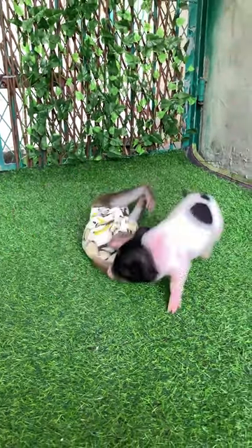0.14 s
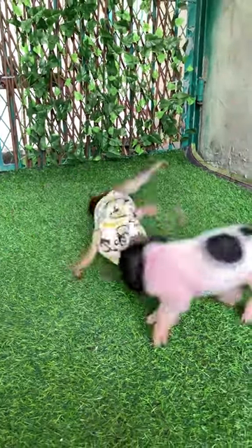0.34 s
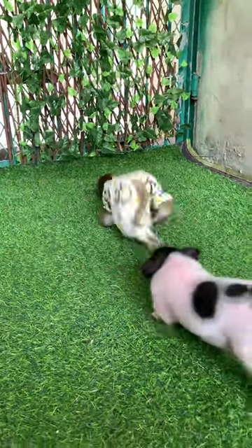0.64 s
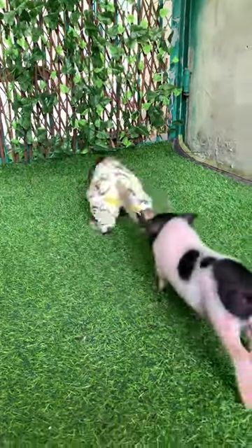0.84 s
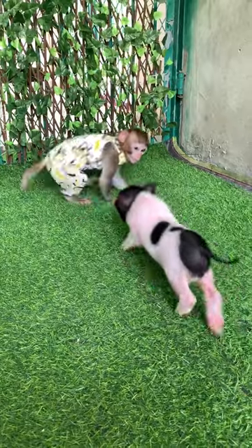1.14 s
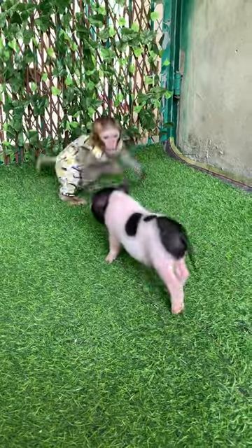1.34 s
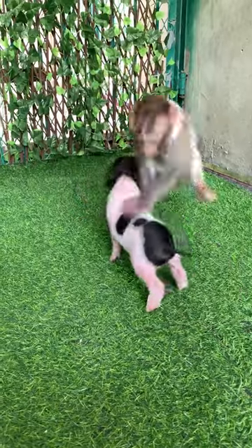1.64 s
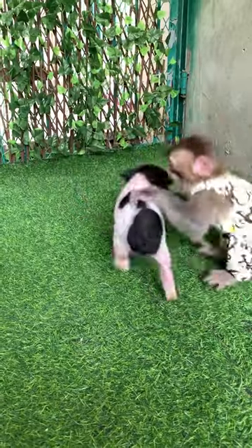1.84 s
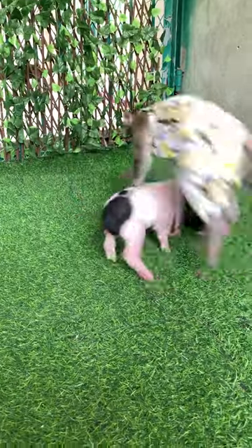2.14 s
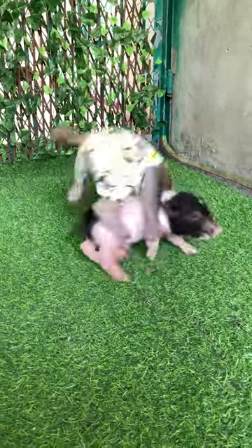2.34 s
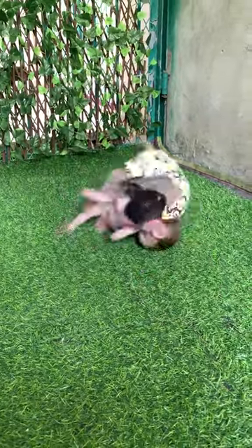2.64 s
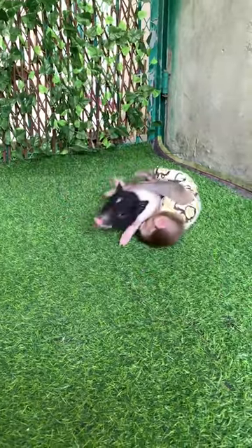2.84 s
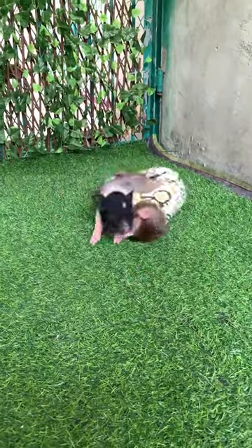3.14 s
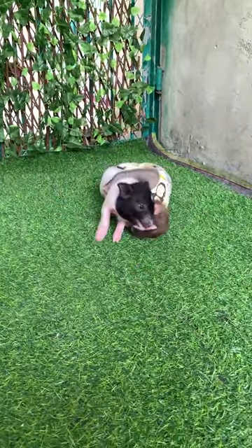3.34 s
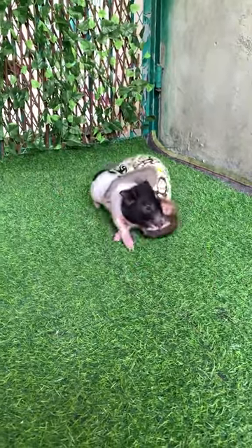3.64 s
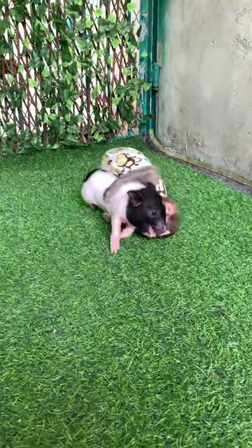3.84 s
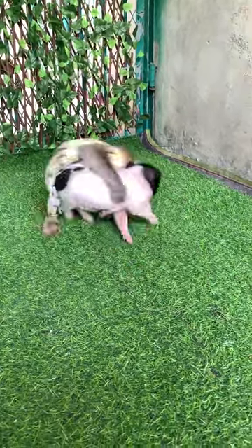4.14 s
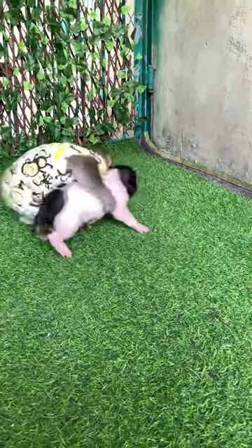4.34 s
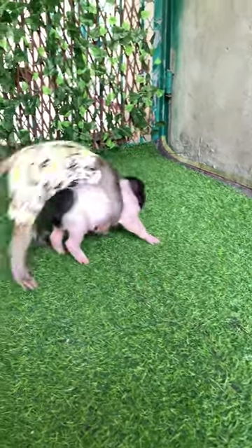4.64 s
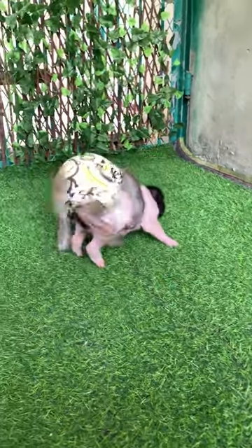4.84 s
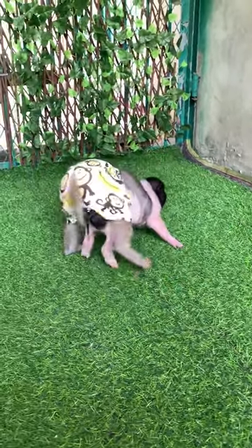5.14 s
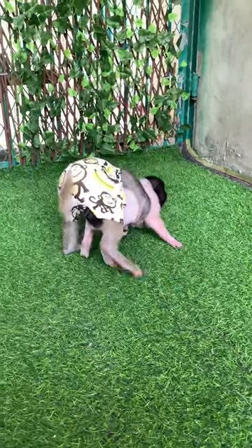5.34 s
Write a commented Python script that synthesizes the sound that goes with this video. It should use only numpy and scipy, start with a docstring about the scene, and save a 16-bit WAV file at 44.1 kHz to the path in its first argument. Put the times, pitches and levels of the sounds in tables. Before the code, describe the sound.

A piglet and a small monkey tussle on artificial turf, with crackly scuffs, dull body thumps and brief rough squeaks over a low rumble.

```python
"""A piglet and a baby monkey wrestle on artificial turf in a small walled yard, close to a stereo microphone.
It opens with a faint squeak, thin chirps and a flurry of scuffs: plastic blades crackle as filtered snaps and
hiss. After a lull bodies thump down as sagging low cycles over a ringing floor; from 2.8 s come short rough
squeaks, harmonic bursts through snout resonances. More scuffs and thumps follow, and a wavering hum swells near
the end. The walls answer with short tails of noise, and a low rumble of coloured noise goes on behind."""
import sys
import numpy as np
from scipy import signal
from scipy.fft import rfft, irfft
from scipy.io import wavfile

SR = 44100
rng = np.random.default_rng(int(sys.argv[2]) if len(sys.argv) > 2 else 0)


def int16_out(signal):
    """Quantize to a 16-bit WAV file."""
    q = np.round(np.clip(np.atleast_2d(signal).T, -1, 1) * 32767)
    wavfile.write(sys.argv[1], SR, q.astype(np.int16))


N = 241294
TIME = np.arange(N) / SR
BINS_HZ = np.arange(N // 2 + 1) * SR / N

# phase by which the left channel leads the right: frequency_hz, lead_radians
CHANNEL_LEAD = [(0, 0), (800, -1), (1750, 0), (2400, 1), (3800, 1.6), (4400, 2.1), (5100, 3.14), (6000, 4.7),
                (7100, 6), (9000, 6.5), (11300, 9.42), (12500, 11.6), (14300, 12.57), (16500, 13)]


def undb(db):
    """Decibels to gain."""
    return 10 ** (np.asarray(db) / 20)


def unit(x):
    """Scale to an rms of one."""
    return x / np.sqrt(np.mean(x ** 2) + 1e-18)


def add(track, start_s, sound):
    """Mix a sound into a track at a time."""
    i = max(int(start_s * SR), 0)
    track[i:i + len(sound)] += sound[:max(N - i, 0)]


def colour(x, points):
    """Shape a sound by a smooth (Hz, dB) spectrum."""
    hz, db = np.transpose(points)
    gain_db = np.interp(np.log(BINS_HZ + 1), np.log(hz), db)
    return irfft(rfft(x) * undb(gain_db), N)


def resonate_twice(x, hz, width_hz):
    """Two passes through one resonance, gain one at its centre; the width is that of a single pass."""
    b, a = signal.iirpeak(hz, hz / width_hz, fs=SR)
    return signal.lfilter(b, a, signal.lfilter(b, a, x))


def lowpass(x, order, hz):
    """Keep what lies below a corner frequency."""
    return signal.sosfilt(signal.butter(order, hz, fs=SR, output="sos"), x)


def tilt(x, db, split_hz=2800):
    """Lean a sound towards its lows (positive dB) or its highs."""
    low = signal.sosfiltfilt(signal.butter(1, split_hz, fs=SR, output="sos"), x)
    return low * undb(db / 2) + (x - low) * undb(-db / 2)


def walk(n, rate):
    """Smooth random wander with a spread near one, through rate points a second."""
    count = int(n * rate / SR) + 2
    points = rng.standard_normal(count)
    return 1.3065 * np.interp(np.arange(n) * rate / SR, np.arange(count), points)


def blades(n, rate, spread_db):
    """Tiny snaps of plastic blades, rate a second and uneven in level, over a fine hiss."""
    struck = rng.random(n) < rate / SR
    sizes = undb(spread_db * np.minimum(rng.exponential(size=n), 5))
    snaps = struck * rng.choice([-1, 1], n) * sizes
    return 1.2 * unit(snaps) + .3 * rng.standard_normal(n)


def patchy(x, patchy_db=3.0):
    """Tufts differ in stiffness, so each half octave of the rustle wavers on its own."""
    octaves = np.clip(np.log2(np.arange(1, N // 2 + 2) * SR / N / 500), 0, 5)
    spectrum, out = rfft(x), np.zeros(N)
    for k in range(11):
        band = np.maximum(1 - abs(2 * octaves - k), 0)  # overlapping triangles
        out += irfft(spectrum * band, N) * undb(patchy_db * walk(N, rate=22))
    return out


def turf(flicker_db=0.43, clump_db=4):
    """Restless shifting, longer slides and single scuffs all flick the same plastic blades."""
    # restless shifting under all the moves: time_s, relative_level_db, low_over_high_tilt_db
    stir = [(0.0, -46, 5), (0.29, -43.5, 18.5), (0.48, -33.5, 13.5), (.56, -32.5, 13), (.62, -35, 14),
            (.68, -36, 17), (.82, -41, 12), (1.14, -45.5, 7), (1.44, -41, 10), (1.54, -43.5, 5),
            (1.72, -45.5, 11), (2.25, -38.5, 14), (2.42, -41, 11.5), (2.51, -35, 8), (2.57, -32, 0),
            (2.7, -29.5, 7), (2.83, -35, 5), (2.98, -38, 9.5), (3.309, -47, 9.5), (3.88, -44, 19.5),
            (4.1, -41.5, 4), (4.24, -39, 7), (4.33, -39, 2.5), (5.0, -41.5, 12.5), (5.12, -42.5, 6),
            (5.27, -53, 19), (5.47, -67.5, -6)]
    # a flank or leg drags, swelling and fading: middle_s, length_s, relative_level_db, low_over_high_tilt_db
    slides = [(0.349, 0.19, -33.5, 15), (0.706, 0.18, -34, 13.5), (0.895, 0.13, -37.5, 16),
              (1.008, 0.19, -40, 11), (1.343, 0.18, -38.5, 12), (1.81, 0.062, -47, 2),
              (1.928, 0.11, -36, 14), (2.06, 0.26, -43.5, 24), (2.242, 0.12, -35.5, 11),
              (2.339, 0.12, -41, 0), (2.573, 0.11, -27, 12), (2.643, 0.16, -24, 9.5),
              (2.744, 0.16, -30, 15), (2.966, 0.16, -36, 11.5), (3.394, 0.092, -45.5, 17),
              (3.497, 0.5, -55.5, 23), (3.625, 0.17, -41.5, 7), (3.807, 0.097, -43.5, 4.5),
              (4.8, 0.14, -53, -17), (4.888, 0.12, -39.5, 15), (5.134, 0.21, -40.5, 4)]
    # a foot or claw rakes the turf: start_s, relative_level_db, decay_s, low_over_high_tilt_db
    scuffs = [(.149, -36.5, 0.015, 14), (0.248, -31, 0.022, 15), (0.29, -26.5, 0.011, 5),
              (0.445, -30, 0.0063, 12), (.510, -24.5, 0.0057, 5.5), (0.586, -31, 0.0091, 22),
              (0.629, -24.5, 0.0058, 14), (.654, -23, 0.0042, 10), (1.294, -33, 0.005, 3),
              (1.312, -35, .009, 8), (1.667, -32, 0.0089, 6), (1.937, -14.5, 0.0063, 21.5),
              (1.948, -25.5, 0.035, 17.5), (2.938, -36.5, 0.013, 26), (3.197, -34.5, 0.034, 6),
              (3.908, -28, 0.018, 14.5), (3.934, -32.5, 0.017, 15), (3.996, -37, 0.0058, 31),
              (4.33, -36.5, 0.0242, 4.5), (4.474, -35.5, 0.0049, 20), (4.527, -34.5, 0.011, 5),
              (4.716, -29.5, 0.01, 17), (4.982, -35.5, 0.015, 7), (5.362, -55.5, 0.0096, -23)]
    # colour of the brushed blades: frequency_hz, gain_db
    turf_colour = [(150, -3.5), (300, -7), (550, -8.5), (1000, -6.5), (1500, -4), (2400, -1.5), (3100, -2),
                   (4200, -1), (6500, 0.5), (9000, 1), (10500, -3), (13000, -1), (16000, -4)]

    times_s, levels_db, tilts_db = np.transpose(stir)
    lean_db = np.interp(TIME, times_s, tilts_db) + clump_db * walk(N, rate=45)  # colour wanders
    snaps = tilt(unit(blades(N, rate=2200, spread_db=-1.2)), lean_db)
    snaps *= undb(np.interp(TIME, times_s, levels_db))

    for middle_s, length_s, level_db, tilt_db in slides:
        n = int(length_s * SR)
        lean_db = tilt_db + clump_db * walk(n, rate=62.2)
        drag = tilt(unit(blades(n, rate=1500, spread_db=-2.0)), lean_db) * np.hanning(n)
        add(snaps, middle_s - length_s / 2, drag * undb(level_db + 0.46))
    snaps = patchy(snaps) * undb(flicker_db * walk(N, rate=90))  # blades catch and let go

    for start_s, level_db, decay_s, tilt_db in scuffs:
        rise_s = 0.54 * decay_s  # a longer stroke also starts more softly
        t = TIME[:int(7 * decay_s * SR)]
        stroke = np.minimum(t / rise_s, 1) * np.exp(-np.maximum(t - rise_s, 0) / decay_s)
        rake = tilt(unit(blades(len(t), rate=9000, spread_db=-4.0)), tilt_db)
        add(snaps, start_s, rake * stroke * undb(level_db))
    return colour(snaps, turf_colour) * undb(4.0)


def crunches(peak_s=0.001, width_hz=910):
    """Stiff tufts buckle under a foot, each cracking as a noise burst in its own band."""
    # start_s, level_db, centre_hz
    tufts = [(0.1508, -39, 890), (.294, -30, 1096), (0.339, -30, 1490), (0.447, -27, 2790),
             (0.514, -23.5, 2320), (.542, -26, 2310), (.576, -37, 1000), (.594, -29, 1180),
             (0.601, -23, 895), (.631, -33, 2400), (0.6534, -20, 1700), (.657, -18, 900),
             (0.667, -35, 1000), (.687, -36, 1500), (.709, -26, 1560), (.914, -44, 2020),
             (1.317, -36, 2000), (1.940, -11.5, 1630), (2.621, -21, 1090), (2.656, -22, 1680),
             (2.678, -24.5, 2940), (2.712, -25, 1600), (2.741, -24, 1810), (2.942, -27, 1700),
             (4.0, -27, 1530), (4.718, -34, 1500), (4.984, -32, 900)]
    out, t = np.zeros(N), TIME[:SR // 25]
    swell = t / peak_s * np.exp(1 - t / peak_s)
    for start_s, level_db, hz in tufts:
        crack = unit(resonate_twice(rng.standard_normal(len(t)), hz, width_hz))
        add(out, start_s, undb(level_db) * crack * swell)
    return out


def ticks(ring_db=-29, ring_s=.004):
    """A claw or hoof catches and snaps free: an instant crack, and the blades around it shiver on."""
    # start_s, level_db, decay_s, low_over_high_tilt_db
    catches = [(.0462, -32, .002, -7), (.1515, -34, .002, 11), (0.4458, -19, 0.00081, 5),
               (.5122, -18.5, 0.001, 1), (0.5144, -28, 0.00088, 2), (0.5425, -22, .0008, 6),
               (.6303, -26, .002, 10), (0.6572, -22.5, 0.0018, 7), (1.2972, -26, .0008, -8),
               (1.6707, -35, 0.0018, -4), (1.9406, -10, 0.0013, 17), (2.2305, -20, .0015, 6),
               (4.2048, -15.5, 0.00072, -4), (4.7178, -30, 0.0013, 5)]
    out, t = np.zeros(N), TIME[:SR // 40]
    for start_s, level_db, decay_s, tilt_db in catches:
        fade = np.exp(-t / decay_s) + undb(ring_db) * np.exp(-t / ring_s)
        crack = tilt(rng.standard_normal(len(t)), tilt_db) * fade
        add(out, start_s, undb(level_db) * crack)
    return out


def thumps(sag=0.27, sag_s=0.017, rise_s=0.00289, slap_hz=400, slap_width_hz=420, decay_cycles=1.64):
    """A soft body or foot lands: a few low cycles that sag in pitch, a dull slap, then the floor booms."""
    # start_s, level_db, starting_pitch_hz, floor_boom_db and slap_db relative to the level
    landings = [(0.149, -32.5, 568, -30, -6), (.375, -20, 148, -13.5, -11.5), (0.635, -24, 123, -10, -21),
                (1.851, -30, 366, -11, -16), (1.956, -16, 139, -7, -13.5), (2.217, -18.5, 345, -26.5, -16),
                (2.218, -32, 622, -35, -17), (2.221, -11, 189.3, -39, -27),
                (2.258, -22.5, 217.6, -20, -36.5), (2.535, -20, 196, -6.5, -11),
                (2.609, -12.5, 148.5, -7.5, -19), (2.632, -9, 125, -20, -45.5),
                (2.926, -21, 163, -11.5, -13), (2.957, -20, 108.6, -16, -27),
                (3.232, -28, 157.7, -13.5, -2.5), (4.269, -19, 208, -11.5, -28), (4.271, -33, 383, -25, -8),
                (4.339, -20, 132, -16, -12.5), (4.479, -22.5, 161, -16.5, -19), (4.979, -12, 161, -20, -26),
                (4.986, -19, 99, -16, -24), (5.067, -33, 106, -3, -36)]
    # ring of the floor under a blow: frequency_hz (nominal), t60_s, gain_db
    floor_modes = [(62.4, 0.51, 6.5), (79.8, 0.64, -4), (107.4, 0.25, 5.5), (160, 0.4, -2.5),
                   (242.5, 0.29, -6), (313, 0.12, -27), (575, 0.11, -16)]
    out, t = np.zeros(N), TIME[:SR // 2]
    for start_s, level_db, hz, boom_db, slap_db in landings:
        pitch_hz = hz * (1 - sag * (1 - np.exp(-t / sag_s)))
        cycles = np.sin(2 * np.pi * np.cumsum(pitch_hz) / SR)
        push = (1 - np.exp(-t / rise_s)) ** 2 * np.exp(-t * hz / decay_cycles)  # low thumps last longer
        slap = unit(resonate_twice(rng.standard_normal(len(t)), slap_hz, slap_width_hz))
        blow = push / push.max() * (cycles + undb(slap_db) * slap)

        boom = np.zeros(len(t))
        for mode_hz, t60_s, gain_db in floor_modes:
            detuned_hz = mode_hz * (1 + 0.025 * rng.standard_normal())  # varies from blow to blow
            boom += undb(gain_db) * np.sin(2 * np.pi * detuned_hz * t) * undb(-60 * t / t60_s)
        boom *= 1 - np.exp(-t / 0.016)
        add(out, start_s, undb(level_db) * (blow + undb(boom_db) * boom))
    return out


def resonances(x, table):
    """Sum of parallel resonances, each of two passes."""
    return sum(undb(db) * resonate_twice(x, hz, width_hz) for hz, width_hz, db in table)


def squeaks(jitter=0.1, rasp=0.31, fade_db=3, flutter_db=3, edge_s=0.0043,
            throat_hz=500, throat_width_hz=380, mouth_width_hz=480):
    """The piglet's voice: pitch and mouth resonance fall together, a growl adds tones between the
    harmonics, and air hisses in step with each cycle."""
    # start_s, length_s, level_db, starting_pitch_hz, fall (share of pitch), overtones_db (relative to the tone),
    # mouth_resonance_hz, roughness (0-1), growl (0-1), hiss_db (relative to the voice)
    bursts = [(0, 0.22, -45, 805, 0.18, -15.5, 1480, 0.57, 0.16, -26),
              (2.776, 0.016, -20.5, 532, 0.082, 11, 1610, 0.07, 0.2, -17.5),
              (2.781, 0.022, -14, 514.3, 0.15, -3.5, 1500, 0.22, 0.04, -7),
              (2.797, 0.016, -19, 637, 0.069, -8, 1520, 0.38, 0, -11),
              (2.81, 0.04, -26.5, 462, 0.059, -1, 890, 0.1, 0.23, -13),
              (3.0632, 0.017, -19.5, 637, 0.17, -26, 1400, 0.02, 0, -20),
              (3.079, 0.019, -23.5, 623, 0.1, -18, 1330, 0.3, 0.09, -21),
              (3.093, 0.024, -24, 694, 0.17, -17, 1330, 0.38, 0.32, -13),
              (3.216, 0.033, -30, 694, 0.26, -17, 1740, 0.4, 0.42, -18),
              (4.259, 0.01, -24.5, 616, 0.056, -12, 1630, 0.3, 0.2, -23),
              (4.2695, 0.018, -20.5, 740, 0.1, -13.5, 1670, 0.28, 0.25, -20),
              (4.282, 0.015, -17, 688, 0.12, -21, 1610, 0.34, 0.05, -22),
              (4.295, 0.078, -34.5, 468.5, 0.146, -7, 1410, 0.67, 0.15, -26)]
    # fixed resonances of the snout: frequency_hz, width_hz, gain_db
    snout = [(1850, 500, -7), (4250, 750, -4)]
    # resonances of the air forced through the snout: frequency_hz, width_hz, gain_db
    snout_hiss = [(4400, 750, 6), (8000, 4100, 1), (13500, 2200, -9)]
    out = np.zeros(N)
    for start_s, length_s, level_db, hz, fall, overtones_db, mouth_hz, rough, growl, hiss_db in bursts:
        n = int(length_s * SR)
        t = TIME[:n]
        along = t / length_s
        edges = np.clip(np.minimum(t, length_s - t) / edge_s, 0, 1)  # opening and closing
        effort = np.sin(np.pi / 2 * edges) * undb(-fade_db * along)

        pitch_hz = hz * (1 - fall * along) * (1 + jitter * rough * walk(n, rate=485))
        phase = 2 * np.pi * np.cumsum(pitch_hz) / SR
        air = rng.standard_normal((3, n)) * (1 + 2.1 * np.cos(phase))
        harmonics = unit(sum(np.cos(k * phase) / k for k in range(2, 11)))
        folds = harmonics + 3 * rough * air[0]

        # crossfade from the starting mouth resonance to the fallen one
        wide = resonate_twice(folds, mouth_hz, mouth_width_hz)
        closing = resonate_twice(folds, mouth_hz * (1 - fall), mouth_width_hz)
        overtones = unit(wide * (1 - along) + closing * along + resonances(folds, snout))
        throat = unit(resonate_twice(air[1], throat_hz, throat_width_hz))
        growl_tones = np.sin(2 * phase / 3) + .5 * np.sin(4 * phase / 3)
        tone = unit(np.sin(phase) + growl * growl_tones)

        voice = unit(tone + 0.88 * rough * throat + undb(overtones_db) * overtones)
        voice *= 1 + rasp * rough * walk(n, rate=404)
        voice *= undb(flutter_db * rough * walk(n, rate=160))
        hiss = unit(resonances(air[2], snout_hiss))
        add(out, start_s, undb(level_db) * unit(voice + undb(hiss_db) * hiss) * effort)
    return out


def chirps(fall=.12):
    """Thin high squeaks, ticks and faint whines: narrow noise that swells, sinks in pitch and fades."""
    # start_s, length_s, level_db, middle_pitch_hz, blur_hz (three times the corner of the low-pass)
    thin_sounds = [(0.019, 0.01, -26.5, 6590, 1500), (0.045, 0.00563, -25, 5860, 1100),
                   (0.042, 0.0138, -33, 2670, 300), (.05, 0.094, -48, 6900, 1500),
                   (0.794, 0.59, -51, 1030, 170), (1.096, .22, -50, 2560, 800),
                   (1.293, .008, -31, 13800, 3000), (1.447, .009, -35, 13000, 1500),
                   (1.514, 0.16, -43, 3830, 700), (1.591, 0.0083, -33.5, 6970, 2600),
                   (1.78, 0.064, -43.5, 3960, 900), (2.096, 0.056, -40, 8660, 1400),
                   (2.804, 0.0044, -28.5, 8850, 2500), (3.092, 0.00685, -25.5, 8000, 3000),
                   (3.105, 0.0073, -32, 7900, 2500), (3.115, 0.011, -33, 7800, 2500),
                   (3.195, 0.0053, -31.5, 8000, 2600), (3.214, 0.0064, -32.5, 7660, 2200),
                   (3.226, 0.005, -38, 8300, 1800), (4.548, 0.075, -45, 2640, 794)]
    out = np.zeros(N)
    for start_s, length_s, level_db, hz, blur_hz in thin_sounds:
        n = int(length_s * SR)
        blur = lowpass(rng.standard_normal((2, n)), 2, blur_hz / 3)
        pitch_hz = hz * (1 + fall * np.linspace(.5, -.5, n))
        phase = 2 * np.pi * np.cumsum(pitch_hz) / SR
        chirp = unit(blur[0] * np.cos(phase) + blur[1] * np.sin(phase))
        add(out, start_s, undb(level_db) * chirp * np.hanning(n))
    return out


def two_channels(x, right_db):
    """Direct sound comes out in two channels with a phase lead that varies with frequency, right over left in
    dB."""
    hz, radians = np.transpose(CHANNEL_LEAD)
    lead = np.exp(.5j * np.interp(BINS_HZ, hz, radians))
    left = irfft(rfft(x) * lead, N) * undb(-right_db / 2)
    right = irfft(rfft(x) / lead, N) * undb(right_db / 2)
    return np.array([left, right])


def yard(x, wet_db, t60_s, treble_t60_s=0.81, build_s=0.014):
    """Scattered wall reflections, different on each side; lows and treble die at their own rates."""
    t = TIME[:SR * 3 // 4]
    noise = rng.standard_normal((2, len(t)))
    low = lowpass(noise, 2, 2000)
    build = np.minimum(t / build_s, 1)
    low_fade, treble_fade = undb(-60 * t / t60_s), undb(-60 * t / treble_t60_s)
    tail = (low * low_fade + .5 * (noise - low) * treble_fade) * build
    tail *= undb(wet_db) / np.sqrt(np.sum((low_fade * build) ** 2))
    return signal.fftconvolve(x[None], tail, axes=1)[:, :N]


def diffuse(pair, direct):
    """Sound from many directions: alike in the two channels in some bands, opposed in others; a direct share
    keeps the channels' phase lead."""
    # likeness of the two channels: frequency_hz, correlation (-1 to 1)
    likeness = [(0, 1), (70, .997), (180, .9), (350, .55), (800, .35), (1400, .82), (1800, .9), (2400, .3),
                (3200, 0), (3900, 0), (4800, -.9), (5100, -1), (5500, -.8), (6500, .6), (7200, .98),
                (9000, .97), (10000, .15), (11300, -.72), (12500, .5), (13400, .98), (16000, .92)]
    # lean towards the right channel: frequency_hz, right_over_left_db
    right_lean = [(150, 0), (700, 3), (1500, .5), (2500, 1.5), (4200, 0)]
    tables = (likeness, CHANNEL_LEAD, right_lean)
    alike, radians, lean_db = (np.interp(BINS_HZ, *np.transpose(table)) for table in tables)
    first, second = rfft(pair)
    share = direct * np.sin(radians)
    mid = first * np.sqrt((1 + alike) / 2)
    side = (1j * share * first + np.sqrt(1 - share ** 2) * second) * np.sqrt((1 - alike) / 2)
    left = (mid + side) * undb(-lean_db / 2)
    right = (mid - side) * undb(lean_db / 2)
    return irfft(np.array([left, right]), N)


def hum(centre_hz=84.16, waver=0.0295):
    """A distant, slightly wavering hum swells out of the rumble and fades."""
    # time_s, level_db (around which it wavers)
    swell = [(0, -58), (4.2, -48), (4.45, -45), (5.3, -33), (5.47, -43)]
    times_s, levels_db = np.transpose(swell)
    pitch_hz = centre_hz * (1 + waver * walk(N, rate=17))
    phase = 2 * np.pi * np.cumsum(pitch_hz) / SR
    return unit(np.sin(phase)) * undb(np.interp(TIME, times_s, levels_db) + 1.7 * walk(N, rate=7.2))


def rumble(level_db=-31):
    """A low, slowly heaving rumble from beyond the walls, made of coloured noise."""
    # distant rumble and air: frequency_hz, gain_db
    rumble_colour = [(12, -5.5), (24, -4), (45, 8), (65, 2), (85, -1.5), (120, -11), (190, -18.5),
                     (270, -16), (380, -30), (650, -31.5), (900, -37.5), (2000, -49), (5000, -139),
                     (15000, -73.5)]
    pair = np.array([unit(colour(rng.standard_normal(N), rumble_colour)) for _ in range(2)])
    return pair * undb(level_db + 1.27 * walk(N, rate=5.4))


def scene():
    """The tussle close by, its reflections and the rumble; the rustle comes from a wide patch of turf."""
    rustle = np.array([turf(), turf()])
    cracks = crunches() + ticks() + chirps()
    blows, voice = thumps(), squeaks()

    around = yard(blows, wet_db=-6.0, t60_s=0.58) + rumble()
    around += yard(rustle[0] + cracks, wet_db=-6, t60_s=.2, treble_t60_s=.16, build_s=.008)
    around += yard(voice, wet_db=-11, t60_s=.38, treble_t60_s=.15, build_s=.012)

    wide = diffuse(rustle, direct=.45) + diffuse(around, direct=0)
    close = two_channels(cracks, right_db=-1.5) + two_channels(blows, right_db=0.6) + two_channels(voice, right_db=3.0)
    return wide + close + hum()


def record(dry):
    """The recorder rounds the loudest peaks and cuts the top steeply."""
    rounded = .85 * np.tanh(dry / .85)
    top_cut = signal.ellip(10, .2, 80, 15850, fs=SR, output="sos")  # ripple dB, rejection dB, corner Hz
    return signal.sosfilt(top_cut, rounded)


dry = scene()
out = record(dry)
int16_out(out)
```